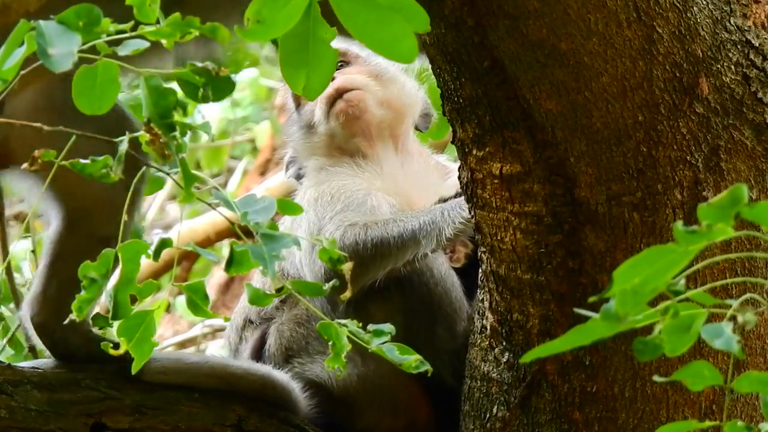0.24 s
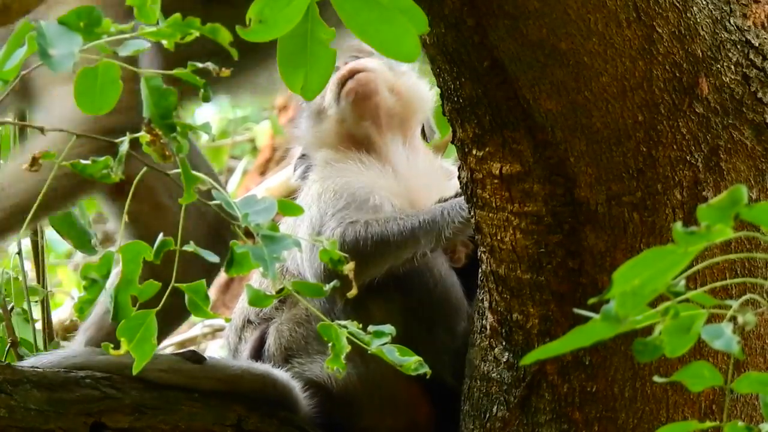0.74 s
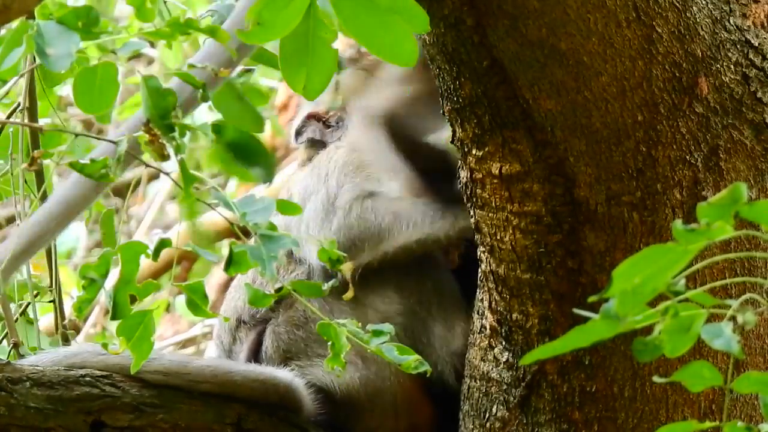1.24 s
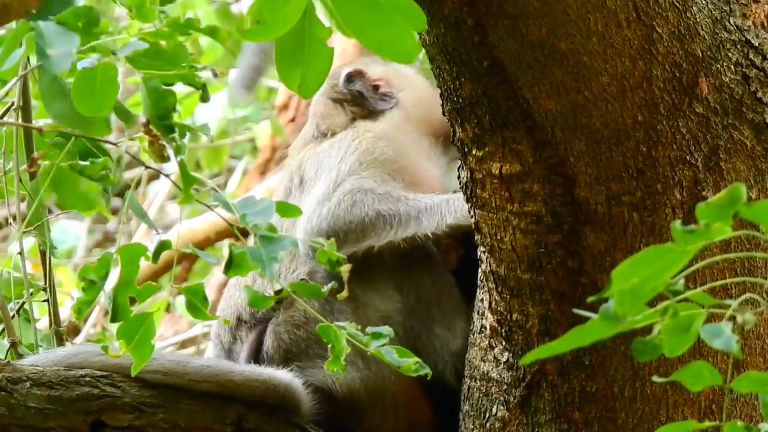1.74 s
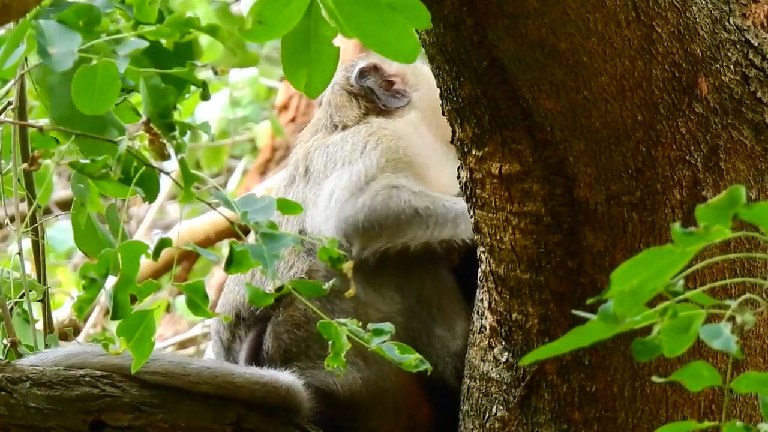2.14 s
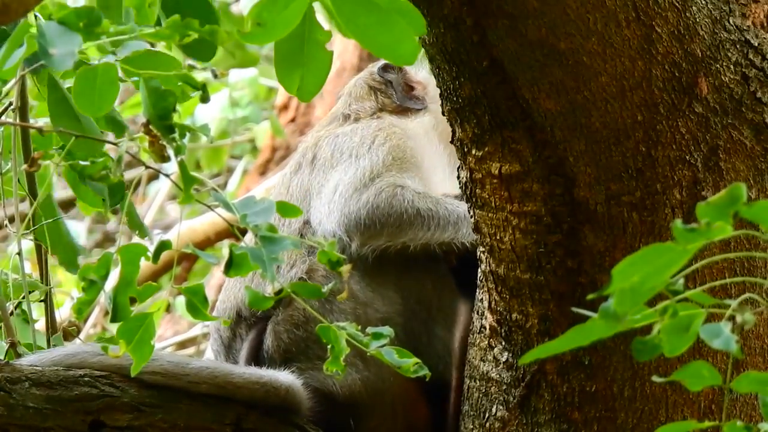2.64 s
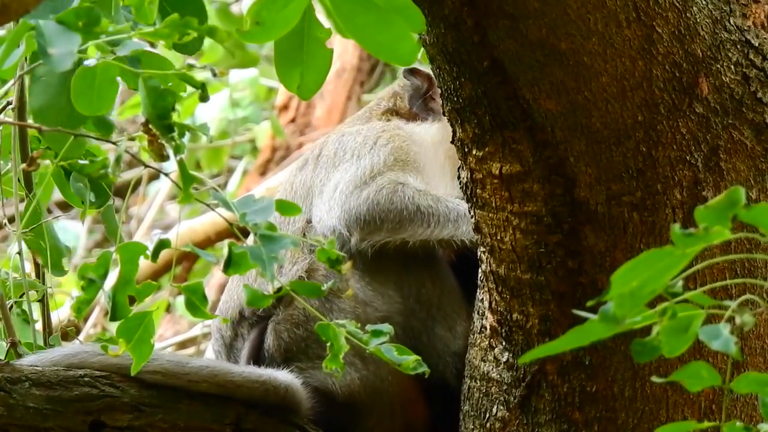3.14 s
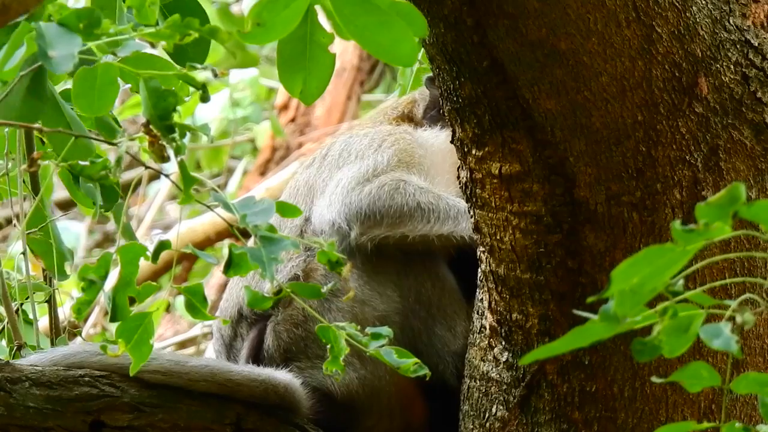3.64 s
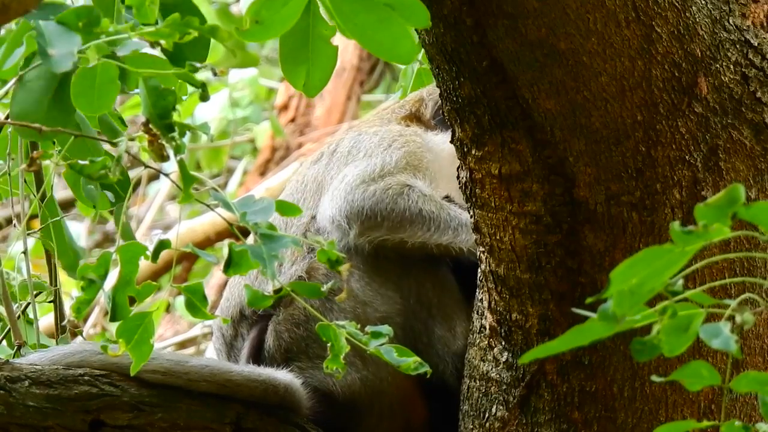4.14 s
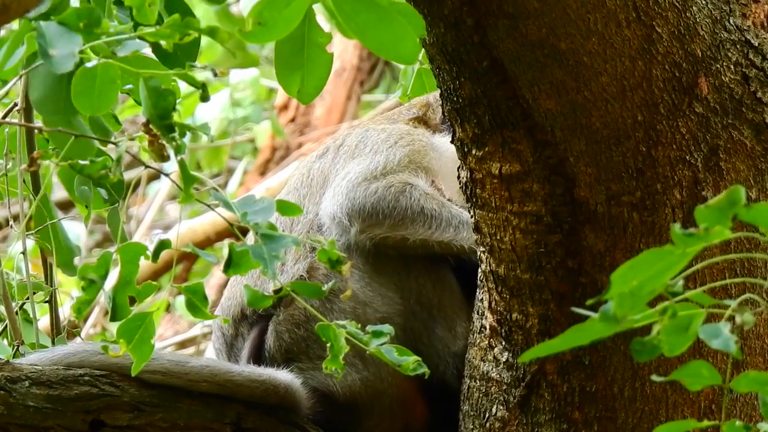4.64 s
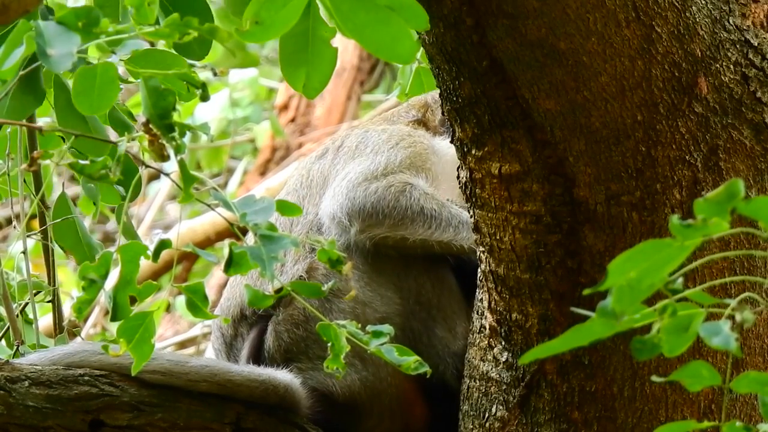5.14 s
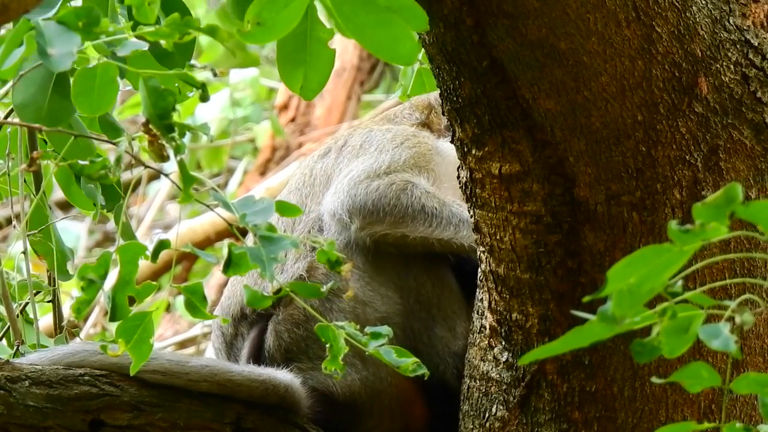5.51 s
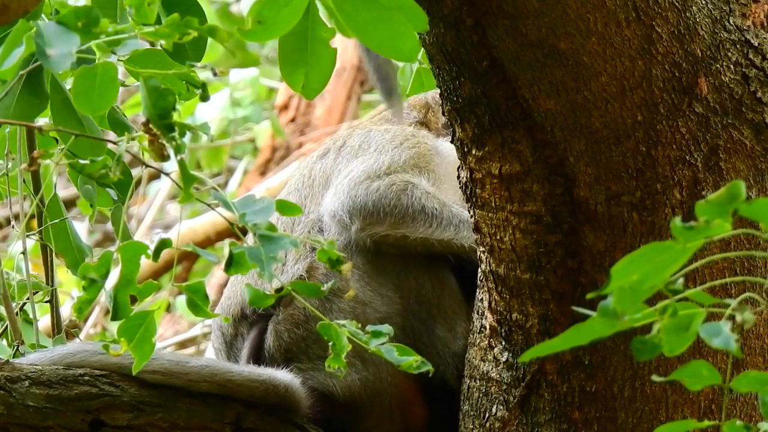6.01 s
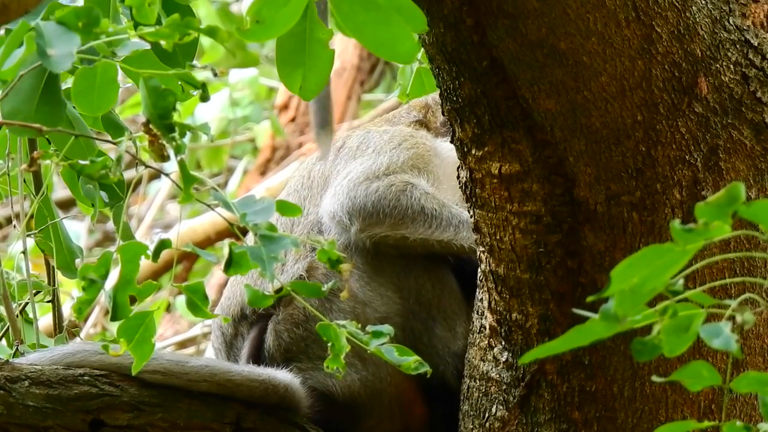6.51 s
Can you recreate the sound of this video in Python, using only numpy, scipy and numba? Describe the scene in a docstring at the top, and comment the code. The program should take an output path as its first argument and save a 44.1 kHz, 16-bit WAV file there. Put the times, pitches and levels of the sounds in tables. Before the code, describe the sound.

High-pitched cicadas drone throughout, spread widely around the microphone in a tropical forest. A nearer group soon joins the far chorus with thin, wavering tones. Underneath are a soft rumble of air, faint bird whistles and the quiet sounds of a monkey climbing: rustling leaves, clicking twigs and two light knocks on wood. The nearer cicadas slowly weaken and drop out just before the end, leaving the distant ones buzzing.

```python
"""A tropical forest opens on a far cicada chorus, a low rumble and faint calls. Near 0.9 s a closer group
of cicadas swells: their buckling ribs excite body resonances, two of which drift as shrill bands.
Birds whistle now and then. From about 1.6 s a monkey climbs, stirring leaves, snapping twigs and
knocking on branches, which ring as damped resonators. After 4 s the near cicadas slowly tire;
at 6.4 s they break off as the far chorus rises again."""
import sys
import numpy as np
from scipy import signal
from scipy.fft import rfft, irfft
from scipy.io import wavfile
from numba import njit

SR = 44100
rng = np.random.default_rng(int(sys.argv[2]) if len(sys.argv) > 2 else 0)


def to_wav(sig):
    """Store sig (one row per channel, or 1-D mono) as 16-bit WAV at the path in sys.argv[1].

    Samples outside -1..1 are clipped; the rate is SR.
    """
    pcm = np.clip(np.atleast_2d(sig), -1, 1) * 32767
    pcm = np.round(pcm).astype(np.int16)
    wavfile.write(sys.argv[1], SR, pcm.T)  # frames by channels


N = 298557
T = np.arange(N) / SR
FREQS = np.fft.rfftfreq(N, 1 / SR)

# width of the sound field: f/Hz, side gain relative to middle/dB
SIDE_GAIN = [(20, -28), (100, -16), (250, -8), (3800, -7.5), (5000, -3.5), (6200, -1.5), (7200, -0.5),
             (8200, 2.5), (17000, 0)]
# spectrum of the forest air: f/Hz, relative level/dB
AIR_SPECTRUM = [(20, -24), (35, -23), (52, -0.5), (75, 5), (130, 1.5), (175, -1), (250, -14), (330, -15.5),
                (450, -18), (640, -14), (790, -26.5), (1100, -17.5), (1400, -21.5), (2500, -22),
                (3800, -15.5)]
# spectrum of the canopy's hiss: f/Hz, relative level/dB
HISS_SPECTRUM = [(2500, -16), (4000, -12), (8000, -1), (9600, -2.5), (11000, -22), (13000, -17),
                 (16000, -24)]
# far hums: f/Hz, resonator bandwidth/Hz, level/dB
HUMS = [(113.56, 2.8, -65), (134.1, 3, -66.5), (648.5, 55, -77), (1087.5, 49, -77), (1733, 35, -89),
        (2060, 41, -100)]
# a small insect's trills: t/s, hold time/s, level/dB
TRILLS = [(0, 0.42, -68), (1.4, 1.3, -70), (3.2, 1.1, -65)]
# bird notes: t/s, duration/s, start f/Hz, end f/Hz, relative level/dB
BIRD_NOTES = [(.8, .26, 3830, 3810, -63), (1.08, .1, 4750, 4130, -60), (1.16, .09, 4160, 4020, -57),
              (1.3, .16, 4150, 4450, -66), (1.85, .12, 4650, 4450, -59), (2.58, .09, 3830, 3810, -60),
              (3.2, .3, 2800, 2350, -65), (3.45, .16, 3100, 3250, -62), (4.56, .14, 2100, 2380, -64),
              (4.69, .09, 2200, 2020, -60), (4.745, .055, 2050, 1620, -58), (4.785, .06, 1640, 1470, -59),
              (4.92, .06, 1450, 1720, -62), (6.53, .15, 1880, 2000, -68)]
# spectrum of a leaf's crackle: f/Hz, relative level/dB
LEAF_SPECTRUM = [(250, -31), (600, 8), (1200, 8), (2200, 12), (3400, 12), (4800, 17.5), (7000, -39),
                 (10000, 1.5), (15000, -25)]
# sprays of leaves brushed aside: peak t/s, level/dB, settling time/s, treble gain/dB
BRUSHES = [(.03, -57.5, 0.64, -2), (.32, -61, .25, -2), (.92, -58, 0.28, 5), (1.77, -58, 0.48, -2),
           (2.35, -59, 1.8, -1), (3.29, -59.5, .35, -3), (3.5, -56, .25, -8), (3.595, -50.5, 0.19, 3),
           (4.048, -44.5, 0.13, 0), (4.31, -58, 0.33, 0), (4.62, -57.5, 0.43, 0)]
# twig snaps: t/s, relative level/dB, f/Hz, T60/s
TWIG_SNAPS = [(.324, -53.5, 2980, 0.024), (1.735, -50, 3500, .03), (1.78, -46, 3770, 0.041),
              (2.332, -52, 3200, .025), (2.649, -52, 4000, 0.036), (3.495, -52, 2640, 0.036),
              (4.022, -51, 7000, 0.079), (4.485, -50, 3600, 0.021), (4.764, -53, 3660, 0.075),
              (5.453, -61, 11000, .012)]
# feet on a branch: t/s, relative level/dB, f/Hz, T60/s
FOOTFALLS = [(2.645, -52, 560, .07), (2.858, -47.5, 168, .2)]
# envelope of the far chorus: t/s, level/dB
FAR_ENVELOPE = [(0, -35.5), (.6, -37), (1.5, -40), (3.5, -41.5), (6, -43), (6.77, -38.5)]
# body responses of the far and near cicadas: f/Hz, relative level/dB
FAR_BODY = [(3800, -30.5), (4600, -17.5), (4900, -3), (5200, 0.5), (5500, -7), (6000, 0.5), (6450, 5),
            (6850, -1), (7500, 0), (7900, -25), (8500, -53), (9000, -31), (11000, -43.5)]
NEAR_BODY = [(3500, -50), (4400, -12.5), (5000, -9), (5550, -3), (5850, 3.5), (6300, -0.5), (6600, -5.5),
             (7000, -2), (7400, -0.5), (7750, -3), (8000, -1), (8500, -7.5), (8850, -20), (10500, -33)]
# thin, wavering tones in the cicada chorus: f/Hz, relative level/dB
WHINES = [(5195, -64), (5879, -58), (6072, -55), (6099, -56), (6250, -58), (6848, -59), (6928, -54),
          (7144, -55), (7262, -57), (7424, -59), (7854, -64), (8000, -64)]
# the near cicadas' drifting resonances: t/s, lower f/Hz, upper f/Hz
RESONANCES = [(0, 6200, 7270), (1.2, 6010, 7060), (2.4, 5840, 7070), (3.4, 5980, 7080), (4.6, 5860, 7085),
              (6, 6060, 7240), (6.77, 6430, 7100)]


def undb(db):
    """Amplitude ratio: tenfold for every 20 dB."""
    return 10 ** (np.asarray(db) / 20)


def level(x, db):
    """Normalisation to a given rms level."""
    return x * undb(db) / np.sqrt(np.mean(x ** 2))


def curves(table):
    """Linear interpolation of a time table's columns, one value a sample."""
    times, *columns = np.transpose(table)
    return [np.interp(T, times, column) for column in columns]


def colour(x, spectrum):
    """Spectral filtering by (f/Hz, gain/dB) points, falling 48 dB an octave beyond both ends."""
    hz, db = np.transpose(spectrum)
    octave, points = np.log2(FREQS + 1), np.log2(hz)
    outside = np.abs(octave - np.clip(octave, points[0], points[-1]))
    return irfft(rfft(x) * undb(np.interp(octave, points, db) - 48 * outside), N)


def wander(rate):
    """Smooth random modulation: `rate` new values a second, with a spread near 1."""
    knots = rng.standard_normal(1024)
    place = T * rate
    k = place.astype(int) % 1023
    ease = np.pi / 2 * (place % 1)
    return knots[k] * np.cos(ease) ** 2 + knots[k + 1] * np.sin(ease) ** 2


def bout(start, hold, attack_s, fade_db_per_s):
    """Envelope: a linear rise ending at `start`, a hold, then exponential decay."""
    rise = np.clip(1 + (T - start) / attack_s, 0, 1)
    return rise * undb(-fade_db_per_s * np.maximum(T - start - hold, 0))


@njit
def resonate(x, hz, width):
    """Second-order resonance: a state-variable band-pass whose centre may move."""
    y, band, low = np.empty(len(x)), 0., 0.
    for i in range(len(x)):
        g, damping = np.tan(np.pi * min(hz[i] / SR, .45)), width / hz[i]
        v = (band + g * (x[i] - low)) / (1 + g * (g + damping))
        band, low = 2 * v - band, low + 2 * g * v
        y[i] = damping * v
    return y


def noise_band(hz, width, samples=N):
    """Narrow-band noise: two equal resonators in cascade leave a blurred tone."""
    centre = np.full(samples, float(hz))
    once = resonate(rng.standard_normal(samples), centre, float(width))
    return level(resonate(once, centre, float(width)), 0)


def spread(pair):
    """Decorrelation: independent middle and side signals make the ears differ more in the treble."""
    return pair[0] + colour(pair[1], SIDE_GAIN) * np.array([[1], [-1]])


def forest(x, wet_db, t60):
    """Reverberation: the direct sound, then dense scattering from trunks and leaves."""
    scatter = rng.standard_normal((2, N)) * undb(-60 * np.minimum(T / t60, 4))
    scatter = spread(scatter / np.sqrt(np.sum(scatter[0] ** 2)))[:, :SR]
    return x + undb(wet_db) * signal.fftconvolve(x[None], scatter, axes=1)[:, :N]


def air():
    """Broadband noise: a swaying wash, strongest in its low rumble, under the canopy's fine hiss."""
    noise = rng.standard_normal((4, N))
    sway = undb(.7 * wander(7))
    wash = level(colour(spread(noise[:2]), AIR_SPECTRUM), -57) * sway
    hiss = level(colour(spread(noise[2:]), HISS_SPECTRUM), -62)
    return wash + hiss


def far_hums():
    """Slow amplitude modulation makes narrow bands of noise come and go."""
    return sum(noise_band(hz, width) * undb(db + 2 * wander(2.415)) for hz, width, db in HUMS)


def insect_trill():
    """A small insect's thin trills: narrow-band noise gated by an envelope."""
    gain = sum(undb(db) * bout(s, hold, attack_s=.15, fade_db_per_s=21) for s, hold, db in TRILLS)
    return noise_band(hz=3360, width=210) * gain


def whistles(notes, quaver_hz):
    """Frequency modulation: each note is a sine with a linear glide and a quick random quaver."""
    out = np.zeros(N)
    quaver = quaver_hz * wander(110)
    for s, length, start_hz, end_hz, db in notes:
        span = slice(max(int(s * SR), 0), int((s + length) * SR))
        progress = (T[span] - s) / length
        hz = start_hz + (end_hz - start_hz) * progress + quaver[span]
        out[span] += undb(db) * np.sin(np.pi * progress) * np.sin(2 * np.pi * np.cumsum(hz) / SR)
    return out


def far_calls(low_hz=281.1, high_hz=3600, glide=.238, count=750):
    """Superposition: many faint calls from deep in the forest merge into a restless background."""
    when, length, pitch, slide, loudness = rng.random((count, 5)).T
    hz = low_hz + (high_hz - low_hz) * pitch ** 1.35
    end_hz = hz * (1 + glide * (slide - .5))
    note_db = 3 * loudness - 1.26 * np.log2(hz / low_hz)  # foliage absorbs the higher notes
    notes = np.column_stack([when * T[-1], .0285 + .0756 * length, hz, end_hz, note_db])
    return level(forest(whistles(notes, quaver_hz=21.7), wet_db=3.5, t60=.33), -64)


def birds():
    """Scattering by the trees smears a few nearer, slightly hoarse whistles."""
    return undb(1) * forest(whistles(BIRD_NOTES, quaver_hz=34), wet_db=3.5, t60=.8)


def leaves(rise_share=.53, fall_db=13.5):
    """Random impacts of leaf on leaf: a climbing monkey's stir and the brushed sprays add in power."""
    impacts = rng.standard_normal(N) * undb(2.73 * rng.exponential(size=N))
    crackle = impacts * (rng.random(N) < .15)
    rustle = level(forest(colour(crackle, LEAF_SPECTRUM), wet_db=1.5, t60=.18), 0)
    soft = colour(rustle, [(20, 0), (6000, 0)])
    treble = rustle - soft
    stir = undb(-62) * bout(start=1.58, hold=3.1, attack_s=.32, fade_db_per_s=9)
    soft_power = treble_power = stir ** 2
    for peak_s, db, settle_s, treble_db in BRUSHES:
        from_peak = np.maximum((peak_s - T) / rise_share, T - peak_s) / settle_s
        surge = undb(db - fall_db * from_peak)
        soft_power = soft_power + surge ** 2
        treble_power = treble_power + (surge * undb(treble_db)) ** 2
    flutter = undb(.43 * wander(26.48))
    return (soft * np.sqrt(soft_power) + treble * np.sqrt(treble_power)) * flutter


def wood_taps(table, relative_width):
    """Damped resonance: snapped or struck wood sounds a noise band that decays exponentially."""
    out = np.zeros(N)
    t = T[:SR // 3]
    for s, db, hz, t60 in table:
        ring = noise_band(hz, hz * relative_width, len(t))
        start = int(s * SR)
        out[start:start + len(t)] += ring * undb(db - 60 * t / t60)
    return forest(out, wet_db=-.5, t60=.43)


def tymbal(rate_hz, jitter, scatter_db):
    """Buckling: one cicada's ribs give an impulse train at its own pace, never quite even."""
    pace_hz = rate_hz * np.exp(.1 * rng.standard_normal())
    timing, strength = rng.standard_normal((8000, 2)).T
    at = (np.cumsum(np.abs(1 + jitter * timing)) * SR / pace_hz).astype(int)
    return np.bincount(at[at < N], undb(scatter_db * strength[at < N]), N)


def far_cicadas(count=3):
    """Incoherent summation blurs distant cicadas into one band, stronger while the near ones rest."""
    song = 0
    for _ in range(count):
        body = colour(tymbal(rate_hz=520, jitter=.2, scatter_db=3), FAR_BODY)
        song = song + forest(body, wet_db=2.5, t60=.27)
    envelope_db, = curves(FAR_ENVELOPE)
    return level(song, 0) * undb(envelope_db + .13 * wander(4.5))


def effort(murmur_db=-47.5, song_db=-37.3, swell_mid_s=.9, swell_s=.27, tire_s=4, stop_s=6.384):
    """The near cicadas' envelope in dB: logistic growth, a slow decay as they tire, then a fast one."""
    swell = .5 + .5 * np.tanh((T - swell_mid_s) / (2 * swell_s))
    gain = undb(murmur_db) + (undb(song_db) - undb(murmur_db)) * swell
    tiring_db = .45 * np.maximum(T - tire_s, 0)
    stopping_db = 38 * np.maximum(T - stop_s, 0)
    return 20 * np.log10(gain) - tiring_db - stopping_db


def cicada_whines(waver_hz=6.98, flicker_db=3, lift_db=6, reach_hz=110):
    """Resonant gain: thin, wavering tones in the chorus swell when a drifting resonance passes."""
    effort_db = effort()
    resonances_hz = np.array(curves(RESONANCES))
    out = 0
    for hz, db in WHINES:
        nearness = np.exp(-((resonances_hz - hz) / reach_hz) ** 2).max(axis=0)
        phase = 2 * np.pi * np.cumsum(hz + waver_hz * wander(14)) / SR
        ear_phase = .42 * rng.standard_normal() * np.array([[1], [-1]])
        gain = undb(db + lift_db * nearness + flicker_db * wander(5.7))
        out = out + gain * np.sin(phase + ear_phase)
    return out * undb(4.5 + effort_db - effort_db.max())


def near_cicadas(count=3):
    """Source and filter: clicks ring the body and two resonances that drift as the abdomen stretches."""
    lower_hz, upper_hz = curves(RESONANCES)
    song = 0
    for _ in range(count):
        body = colour(tymbal(rate_hz=420, jitter=.1, scatter_db=2), NEAR_BODY)
        lower = level(resonate(body, lower_hz, width=150.), -11)
        upper = level(resonate(body, upper_hz, width=320.), -.5)
        song = song + forest(level(body, 0) + lower + upper, wet_db=5, t60=.5)
    return level(song, 0) * undb(effort())


def scene():
    """Linear superposition of insects, birds, air and the monkey's small noises."""
    whines = cicada_whines()
    calls = birds() + far_calls()
    snaps = undb(3) * wood_taps(TWIG_SNAPS, relative_width=.5)
    steps = wood_taps(FOOTFALLS, relative_width=.38)
    cicadas = near_cicadas() + far_cicadas() + whines
    background = far_hums() + insect_trill() + air()
    return background + calls + leaves() + snaps + steps + cicadas


def record(dry):
    """Channel imbalance and band limiting: a more sensitive right microphone, a low-pass at 16.5 kHz."""
    tilted = dry * undb(np.array([[-.25], [.25]]))
    return signal.sosfilt(signal.ellip(10, .1, 70, 16500, fs=SR, output="sos"), tilted)


dry = scene()
out = record(dry)
to_wav(out)
```